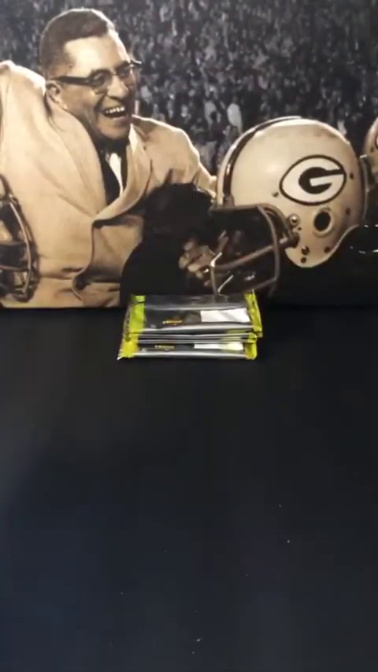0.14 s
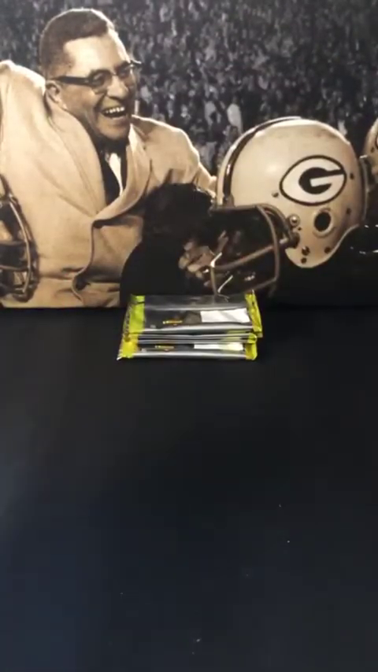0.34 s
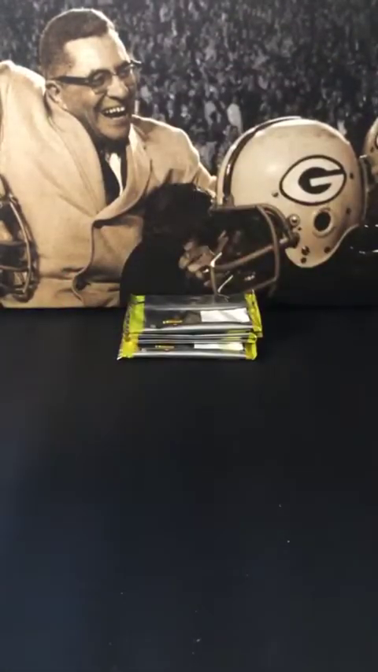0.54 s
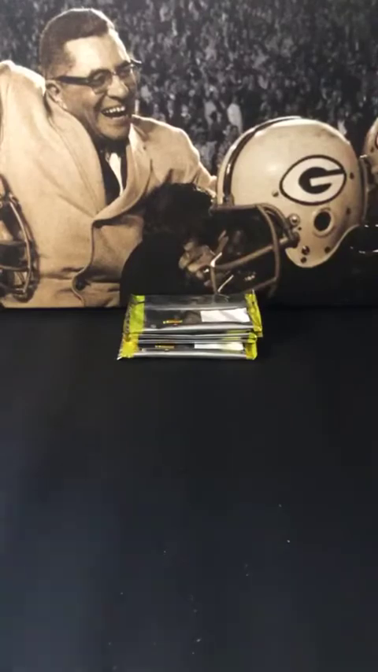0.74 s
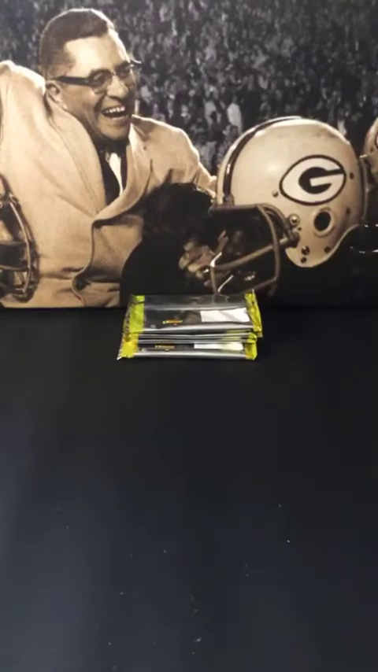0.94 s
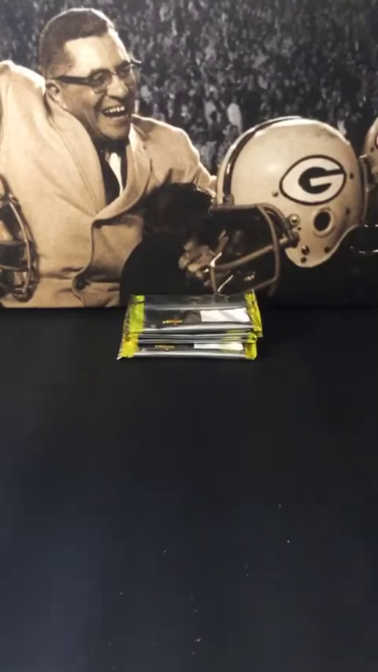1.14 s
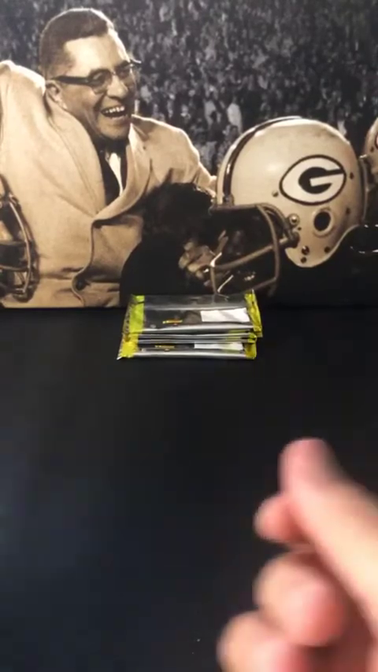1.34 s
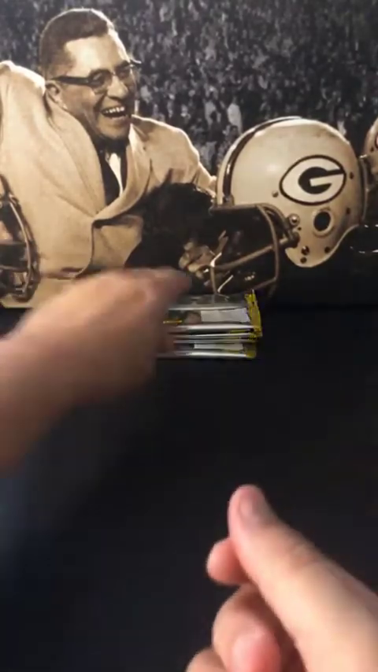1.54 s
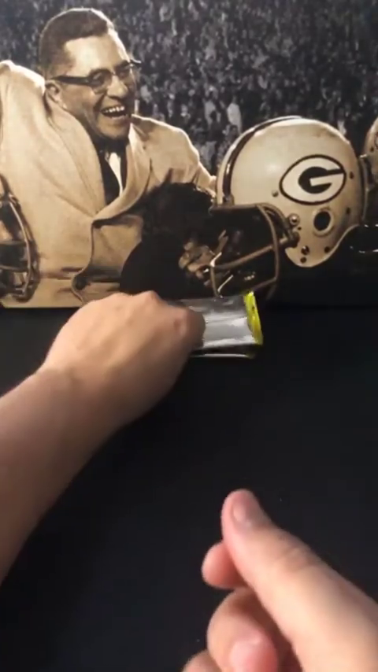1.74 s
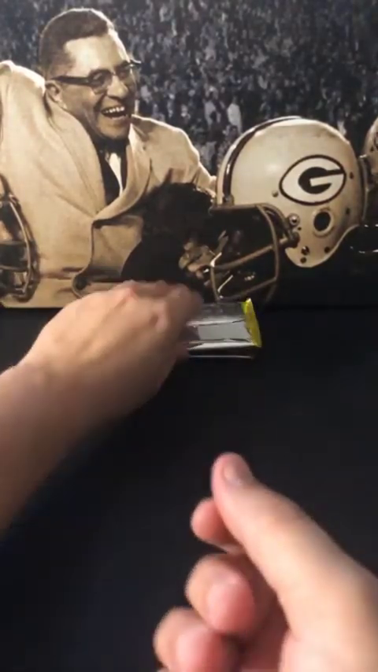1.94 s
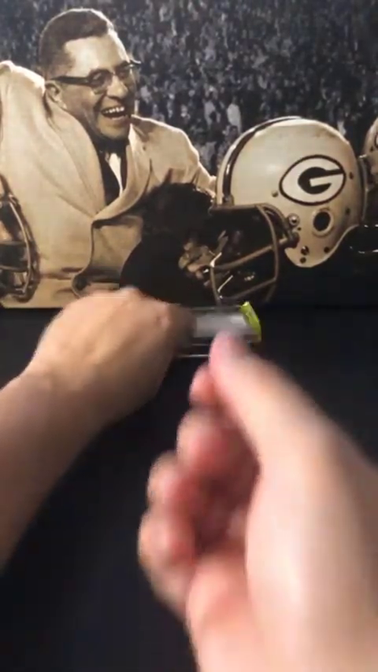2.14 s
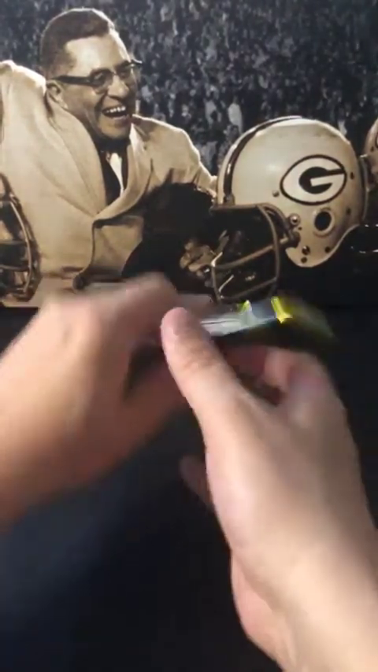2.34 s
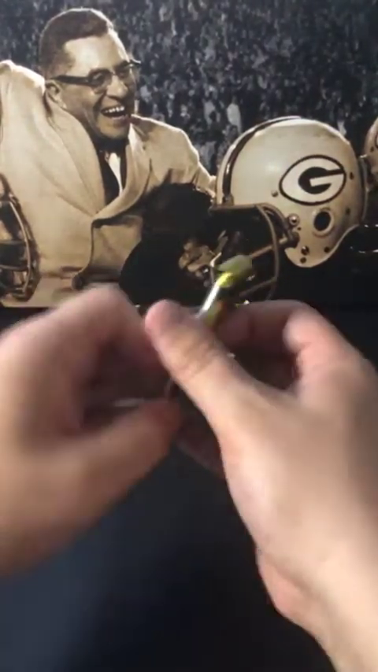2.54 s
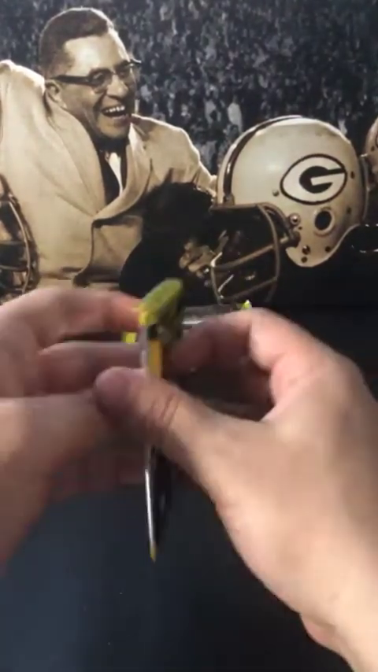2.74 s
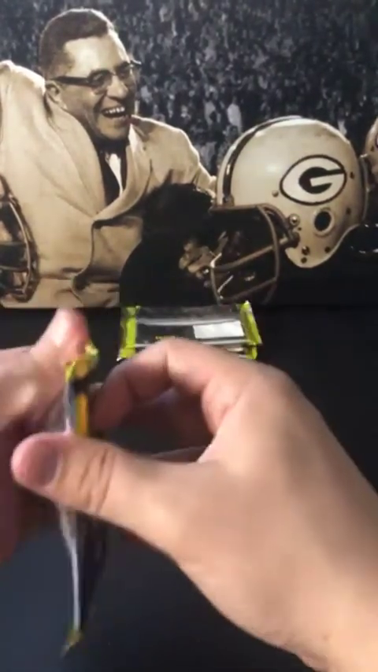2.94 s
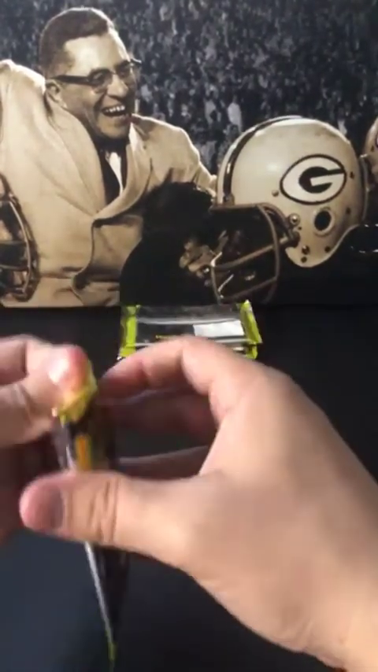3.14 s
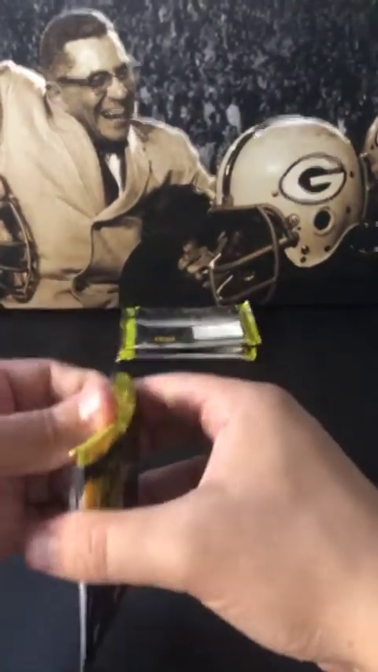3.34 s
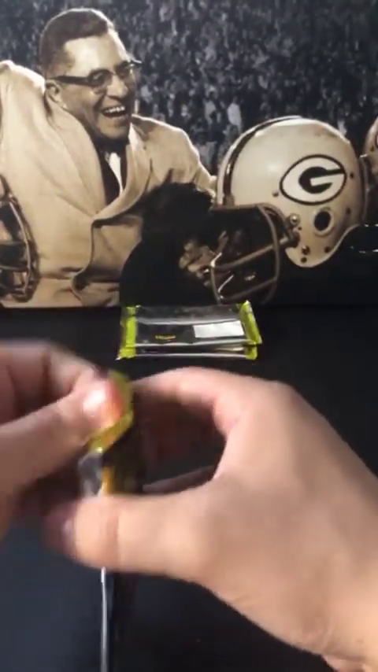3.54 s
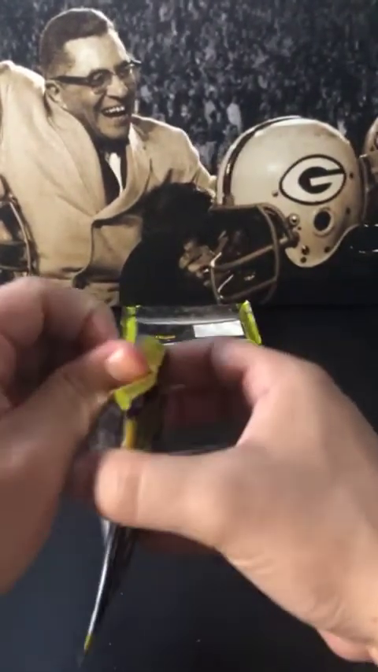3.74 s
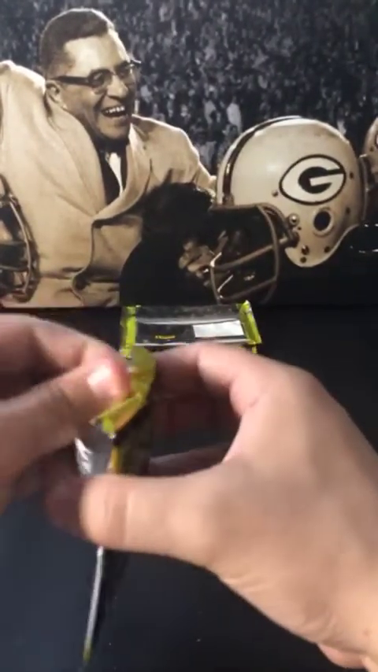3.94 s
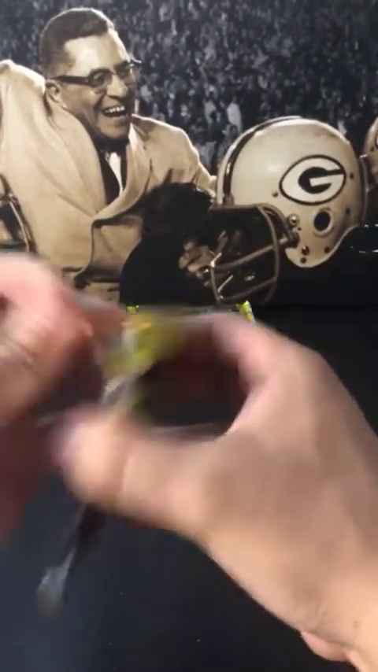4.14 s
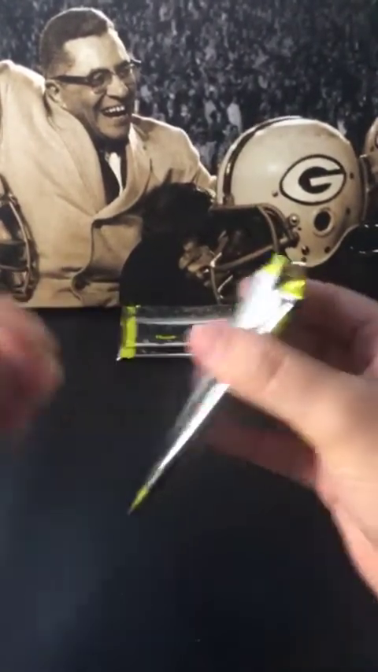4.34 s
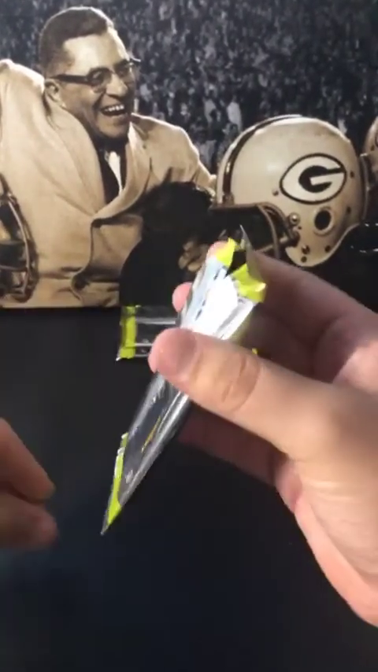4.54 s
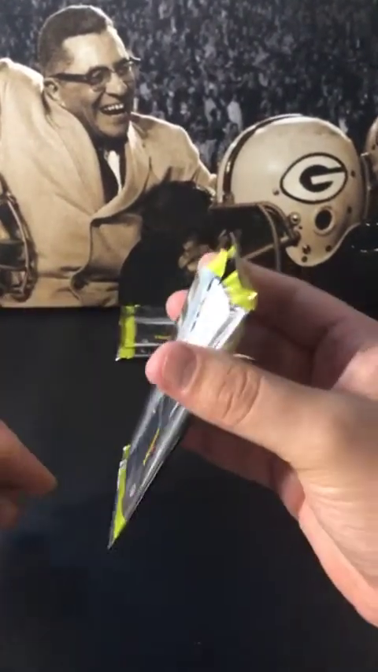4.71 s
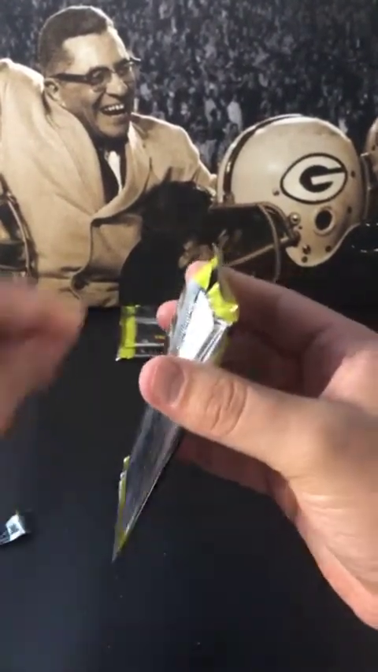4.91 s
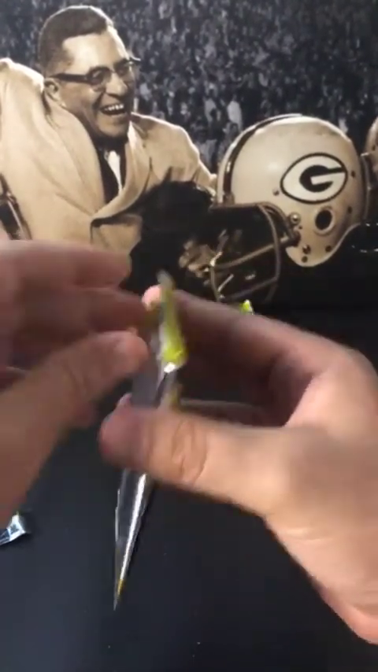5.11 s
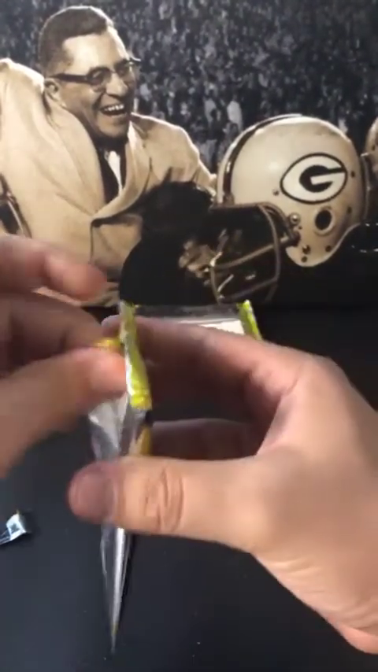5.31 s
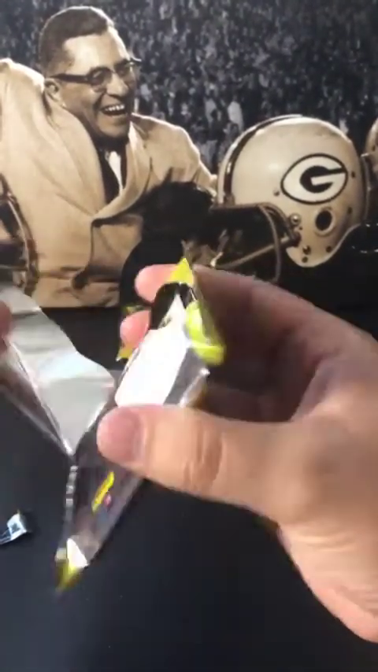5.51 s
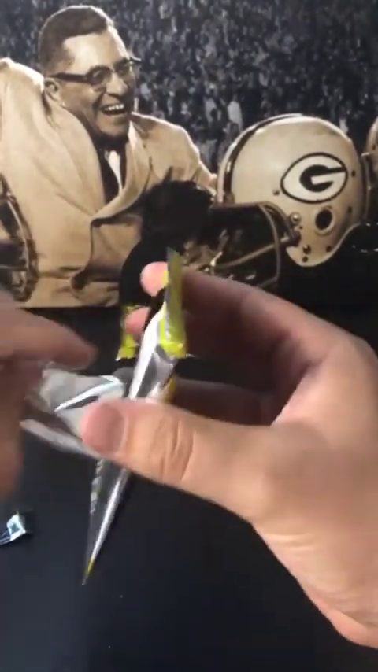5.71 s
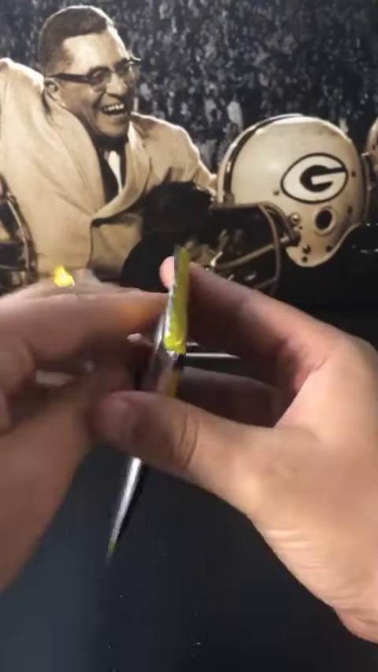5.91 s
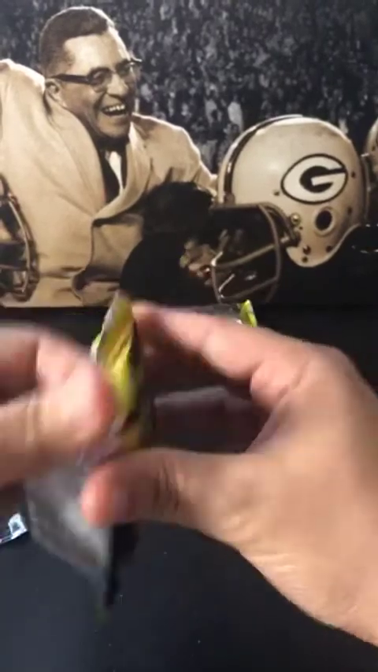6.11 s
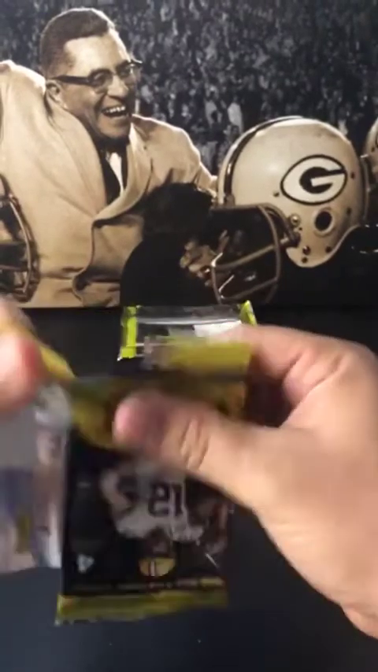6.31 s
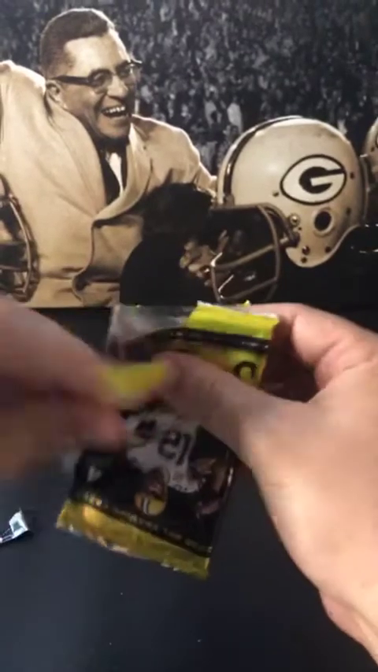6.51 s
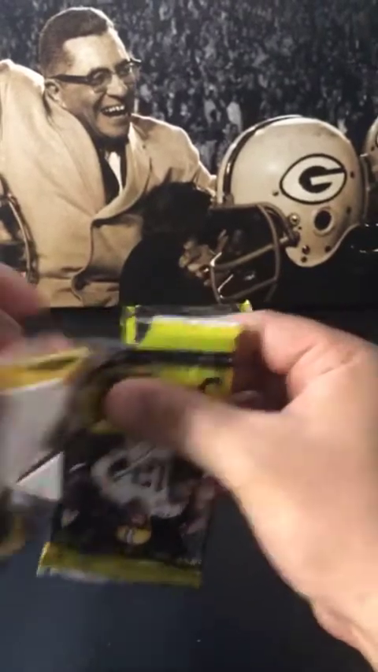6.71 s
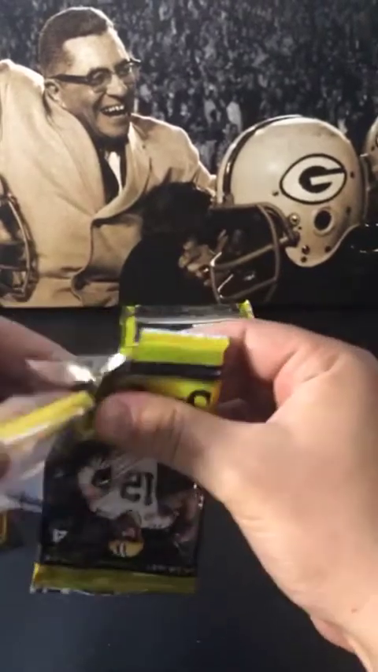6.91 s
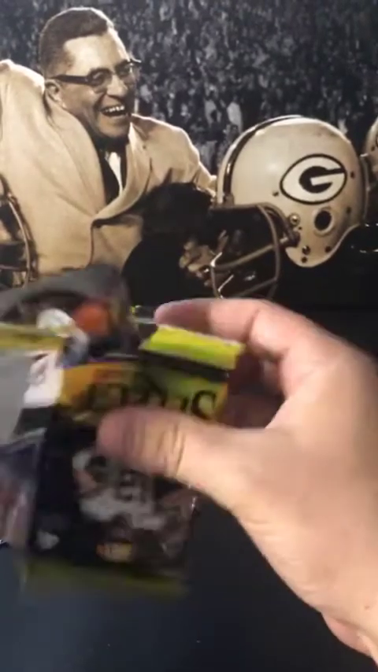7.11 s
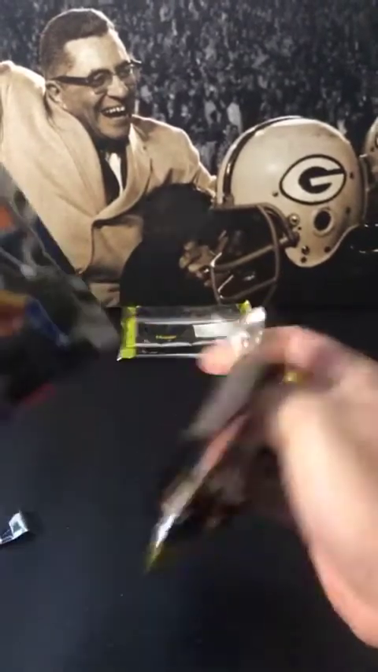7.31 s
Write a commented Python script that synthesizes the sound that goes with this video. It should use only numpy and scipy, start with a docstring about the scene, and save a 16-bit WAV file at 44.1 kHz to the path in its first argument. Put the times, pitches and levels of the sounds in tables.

```python
"""A foil pack is picked off a table, crumpled at the seam, ripped open and peeled back, close by.
Creases buckle in short snaps over a finer crackle, each tear is a dense train of tiny fractures, and table
reflection and microphone colour them all. The loose sheet and the cards push air in low lumps.
Skin and sleeve slide, the table rumbles under the leaning arm, and at first something ticks nearby.
The small soft room answers briefly and hums low."""
import sys
import numpy as np
from scipy import signal
from scipy.fft import rfft, irfft, next_fast_len
from scipy.io import wavfile
from scipy.ndimage import uniform_filter1d

SR = 44100
rng = np.random.default_rng(int(sys.argv[2]) if len(sys.argv) > 2 else 0)


def generate_wav(sig):
    """Save sig (samples, or channels by samples) to the path in sys.argv[1] as 16-bit PCM at SR."""
    pcm = np.round(np.clip(np.atleast_2d(sig).T, -1, 1) * 32767).astype(np.int16)
    wavfile.write(sys.argv[1], SR, pcm)


N = 328986

# Spectra of room tone, table, friction and foil. Each row: frequency in Hz, relative density in dB.
HUM_SPECTRUM = [(53, -24.5), (90, -3), (210, -5.5), (279, -8), (558, -13.5), (650, -18), (1550, -24),
                (1770, -24.5), (12500, -47), (14900, -46.5), (16200, -76.5)]
TABLE_SPECTRUM = [(18, -40), (30, 2), (54, -1.5), (78, -4), (193, -22), (231, -42.5), (270, -43.5),
                  (300, -60.5), (390, -85.5), (660, -120)]
FRICTION_SPECTRUM = [(590, -8.5), (1000, -18), (1770, -6.5), (1970, -8.5), (4000, -16.5), (6090, -18),
                     (12100, -23.5), (16200, -33)]
FOIL_SPECTRUM = [(250, -41.5), (400, -2.5), (700, -8.5), (1000, 8.5), (1800, 8), (2600, 10.5), (3300, 0.5),
                 (4700, 9.5), (6800, 1.5), (11700, 0.5), (14000, -4.5), (16200, -8)]
# Room resonances; peaks and dips of table reflection and microphone that colour the foil and sliding.
# Each row: centre in Hz, bandwidth in Hz, gain added at the centre.
ROOM_MODES = [(171, 7.1, 1.2), (275.5, 12, 2.4), (397, 38, 1.5)]
CLOSE_COLOUR_MODES = [(644, 860, -0.56), (906, 350, 0.48), (1600, 360, -0.042), (2480, 1500, -0.45),
                      (3275, 1090, 0.49), (3920, 380, 0.22), (5640, 1600, -0.21)]
# Arms knock or lean on the table. Each row: start in seconds, hold in seconds, level in dB.
ARM_BUMPS = [(.915, .03, -48), (1.28, .03, -53), (1.71, 0.21, -31), (2.11, 0.038, -51.5),
             (2.27, 0.13, -45.5), (2.52, 0.025, -43.5), (2.69, 0.036, -48.5), (3.245, .03, -34.5),
             (3.945, 0.034, -42.5), (4.1, 0.11, -45.5), (5.3, 0.039, -47.5), (5.66, 0.063, -53.5),
             (6.03, 0.052, -48)]
# Dry ticks. Each row: start in seconds, peak in dB, pitch in Hz, relative treble level in dB.
DRY_TICKS = [(0.1565, -36.5, 2030, -22), (0.1644, -24.5, 2170, -21), (0.1722, -33, 4760, -21),
             (0.556, -50, 1560, -9), (0.8073, -42, 1530, -28), (0.8253, -32.5, 1550, -33),
             (0.8881, -31.5, 1700, -2.5), (0.8974, -34.5, 1010, -24), (1.3174, -51, 1510, -20)]
# Envelopes of sliding skin and sleeve, of the sleeve's swish, and of the hands at work on the foil
# (picking up, prying, peeling), one list a stroke. Each row: time in seconds, level in dB.
SLIDE_STROKES = [
    [(0.95, -96), (1.316, -67), (1.54, -66)],
    [(1.55, -54.5), (1.69, -47)],
    [(1.69, -51.5), (1.96, -74)],
    [(1.96, -51.5), (2.09, -47.5), (2.186, -61), (2.31, -91)],
]
SLEEVE_STROKES = [
    [(1.0, -83), (1.3, -76), (1.54, -71)],
]
HAND_STROKES = [
    [(1.55, -57), (1.7, -60), (1.8, -71.5), (1.95, -75), (1.99, -64), (2.1, -62), (2.2, -70), (2.3, -68.5)],
    [(2.3, -62), (2.37, -58), (2.49, -53), (2.65, -55), (2.78, -43), (2.87, -39), (3.05, -39), (3.35, -58),
     (3.46, -40.5), (3.6, -49), (3.93, -47), (4.1, -51), (4.26, -54), (4.33, -64), (4.59, -56.5),
     (4.7, -65)],
    [(5.04, -70), (5.1, -55), (5.23, -59), (5.3, -44), (5.45, -43), (5.5, -58), (5.64, -44), (5.76, -55),
     (5.89, -51), (6.02, -36), (6.26, -44), (6.48, -48), (6.6, -44), (6.8, -56), (6.93, -46), (7.15, -45),
     (7.27, -39), (7.46, -40)],
]
# Buckling creases. Each row: start in seconds, peak of the buckled patch in dB, its pitch in Hz,
# body and sizzle in dB relative to the patch, nominal length in milliseconds.
CREASE_SNAPS = [(1.5585, -28, 3700, 0.5, -15, 4.7), (1.5848, -21.5, 3790, -4, -17, 2),
                (1.5963, -36, 3830, 8, -12, 2.8), (1.6098, -34, 1590, 3, -14, 5.4),
                (1.6535, -23.5, 4130, -5, -7, 5.6), (1.6778, -28.5, 4690, -4, -8.5, 4.7),
                (1.731, -29.5, 4300, -2.5, -9, 5.5), (1.757, -34.5, 1940, -5, -10.5, 3.5),
                (1.8522, -41, 1660, 4.5, -25, 5.1), (1.9672, -29, 3760, 4.5, -23.5, 3),
                (1.9972, -18, 3460, -9.5, -35, 0.87), (2.0674, -35.5, 4010, -13, -24.5, 4.4),
                (2.0738, -27.5, 4050, -7, -12.5, 3.7), (2.0979, -26.5, 1770, -8, -15, 7.7),
                (2.1294, -30.5, 1810, -6, -14, 2.8), (2.1513, -40, 1850, -2, -4, 2.4),
                (2.3166, -24, 3950, -0.5, -2, 9.5), (2.385, -32, 1420, 2, -6, 8.2),
                (2.4232, -30, 3700, -1.5, -4, 2.1), (2.461, -28.5, 1430, -6, -19, 1.7),
                (2.4854, -33.5, 4180, -6, -14, 4.6), (2.5167, -28, 4180, -13, -5, 1.4),
                (2.5363, -32, 4390, -18, -0.5, 3.3), (2.5431, -20.5, 6030, -7.5, 0, 3.6),
                (2.618, -24, 4780, -23.5, 1, 4.1), (2.6267, -24, 4050, -27, 2, 4.2),
                (2.6427, -26, 4180, -18.5, 2, 3.6), (2.681, -17.5, 3420, -33, -2, 4.4),
                (2.699, -19.5, 4200, -16, -2, 28), (2.7113, -12, 3930, -8, -2.5, 9.5),
                (2.7234, -11, 4300, -25, -12, 1.6), (2.7647, -22, 6120, -26.5, 5, 2.5),
                (2.7977, -7.5, 3660, -28, -12, 2.4), (2.809, -22.5, 3620, -17, 7.5, 4.2),
                (2.8524, -21, 3170, -9, 0, 6.4), (2.8618, -18, 3470, -3.5, -13.5, 5.5),
                (2.8734, -15, 3960, -17, -5, 5.3), (2.8806, -9, 3470, -8.5, -1.5, 6.5),
                (2.887, -20, 5940, -20, -1, 6.8), (2.8944, -7, 3760, -19, -4, 2.4),
                (2.904, -24, 4870, -18, 12, 2.3), (2.9117, -18, 3790, -18, 5, 2.8),
                (2.9185, -14, 3100, -3, -10, 1.7), (2.9262, -23.5, 3360, -5, -4, 5.0),
                (2.9432, -10, 3200, -2, -8, 7.1), (2.952, -17, 3700, -1, 2, 1.9),
                (3.0206, -22, 3900, -24, 6.5, 3.3), (3.047, -15.5, 3060, -23, -0.5, 4.5),
                (3.067, -7.5, 4500, -21, -3, 3.3), (3.0922, -14.5, 5000, -30, -2, 1.9),
                (3.1233, -13.5, 3800, -11, 0, 5.9), (3.1341, -24, 3620, -35, -8, 5.4),
                (3.1427, -17, 4610, -10, 3, 6.9), (3.1696, -7.5, 3560, -1.5, -5.5, 2.7),
                (3.1835, -14.5, 4350, -17, -8, 6.6), (3.1971, -22, 2120, 5.5, -7, 5),
                (3.2165, -8, 3250, -34, -12, 4.1), (3.2309, -6.5, 3530, -21, -5, 5.9),
                (3.2518, -24, 3960, -1, -3, 4.3), (3.2868, -22, 1510, -13, -15, 3.8),
                (3.293, -1.5, 3050, -29, -13, 2.7), (3.319, -19.5, 5000, 3.5, -16, 1.7),
                (3.3476, -3, 6800, -9.5, -18, 3.2), (3.3696, -11, 3440, -27, -24, 4.3),
                (3.4217, -17.5, 3630, -12, -16.5, 4), (3.4288, -18, 3330, 0.5, -26, 2.8),
                (3.476, -17, 6160, -27, -5, 3.7), (3.499, -14, 1370, -27, 2, 3.2),
                (3.5139, -30, 4690, -9.5, 7, 3.3), (3.526, -17, 3940, -25.5, -3, 2.7),
                (3.5371, -31.5, 3360, 1, 15, 3.6), (3.5612, -11.5, 3530, -15, -11, 4.7),
                (3.598, -31, 3870, -12, -11, 3.1), (3.6203, -18, 3790, -15.5, -12, 2.5),
                (3.628, -17.5, 4780, -6.5, -5.5, 4.2), (3.6427, -16, 3500, -11, -8, 2.7),
                (3.6488, -15, 3230, -4.5, 5.5, 3.3), (3.6583, -22.5, 6120, -27, -5, 2.8),
                (3.6652, -16, 4650, -21, -2, 2.5), (3.6955, -19, 1403, 0, -2, 2.4),
                (3.7341, -17.5, 4930, -17, -3, 4.8), (3.7427, -25.5, 3790, -1, -1.5, 3.6),
                (3.7505, -21.5, 3320, -1.5, 5, 6.2), (3.7671, -26, 4780, 0, 3, 7.3),
                (3.7825, -15, 3930, -10, -5, 5.9), (3.8001, -11.5, 5870, -4.5, -7, 5.2),
                (3.8571, -22, 1470, -15, -23, 7.3), (3.899, -27, 3790, 1, 8.5, 5.2),
                (3.9437, -11.5, 3270, -1, 2, 21), (3.9586, -6.5, 2560, -4.5, -5, 3.3),
                (3.9914, -9, 3620, 0, -6.5, 1.8), (4.0358, -23, 4600, 1.5, -7, 5),
                (4.0798, -26, 4010, 0, -3, 4.2), (4.1013, -5, 3100, -9, -5.5, 7.7),
                (4.111, -9.5, 3700, -4.5, -10, 12), (4.1206, -14.5, 3430, -5, 3, 3.9),
                (4.1404, -14, 3400, -0.5, -6, 3), (4.1497, -19.5, 3100, -6, -11, 19.6),
                (4.156, -16.5, 3530, 2, 5, 7.4), (4.2736, -23, 2620, -5, -2, 7.1),
                (4.3043, -16, 4680, -20, -2.5, 2.07), (4.402, -47, 4000, -20, 16, 1.9),
                (4.4435, -33, 2500, 0, -6, 3.4), (4.5126, -29.5, 2350, -5.5, -1.5, 2.6),
                (4.5588, -9.5, 4090, -14, -4.5, 5.4), (4.6388, -27, 4300, -6, -7, 8.5),
                (4.7179, -43.5, 2940, 3, -32, 5), (4.7744, -49, 4130, -10, 0, 2.7),
                (5.0226, -47.5, 1500, 9.5, -17, 2.3), (5.0589, -28.5, 2490, 1, -10, 4.8),
                (5.075, -21.5, 5200, -3.5, -6, 6.1), (5.0819, -22, 6980, -24, -1, 3.6),
                (5.0889, -18.5, 6370, -20, -2, 4), (5.0974, -21.5, 3980, -26, 0.5, 4.8),
                (5.1167, -21.5, 6530, -20, 0, 4), (5.142, -30.5, 5640, 0, -6, 7.7),
                (5.175, -31.5, 4010, -6, -22, 3.4), (5.203, -15.5, 1550, -6, -0.5, 4.1),
                (5.2074, -18.5, 4060, -2.5, -3, 6.4), (5.2789, -13.5, 6200, -3, 2.5, 4.9),
                (5.2863, -11.5, 4220, -3.5, 1, 2.3), (5.2967, -8, 3050, -6.5, -6, 6),
                (5.3056, -19.5, 3920, -7, -7, 5.3), (5.3222, -15, 4650, 4, -12.5, 4.1),
                (5.3321, -3.5, 4440, -11, -0.5, 5.4), (5.3477, -7.5, 3800, -9, -13.5, 3.5),
                (5.3604, -13, 5990, 0, 0, 5.4), (5.4786, -24.5, 5600, -19, -20, 2.8),
                (5.4978, -32.5, 3900, -8, 7, 2.2), (5.5202, -21.5, 3960, -29.5, -1.5, 4.8),
                (5.568, -22, 2800, -5, 5, 6.8), (5.5776, -17, 4030, -9.5, 0.5, 2.9),
                (5.5992, -16.5, 2500, -8, -10, 3.6), (5.6097, -18, 2560, -12, -9.5, 2.8),
                (5.6265, -32, 4740, -11, -11, 4.0), (5.6615, -13.5, 4970, -11, -3, 13.6),
                (5.704, -31, 3190, -4, -13, 2.2), (5.7842, -28.5, 6290, 4, -15, 12.6),
                (5.8345, -15, 3920, -10.5, -9.5, 5), (5.8648, -25.5, 3140, -12, 3, 6.8),
                (5.8776, -25.5, 3030, -1, -8, 4.9), (5.9189, -11, 2620, -13, -7, 4.4),
                (5.9317, -16.5, 2950, -11.5, -1, 7.1), (5.9919, -13, 2940, -13, -6.5, 3.5),
                (6.003, -14.5, 4650, -2, 0, 2.1), (6.0249, -13.5, 2600, -1, 1, 3.6),
                (6.0326, -13.5, 2710, -13, 8, 3.3), (6.0423, -1, 2280, -10.5, -12, 7.3),
                (6.0578, -21, 3880, 1, -10, 9.7), (6.067, -11.5, 2530, -22, -3.5, 4.4),
                (6.0858, -11, 2560, -18, -4, 5), (6.1022, -8.5, 5340, -27, -6, 4.5),
                (6.1236, -10.5, 4780, -3.5, 4.5, 3.1), (6.1493, -7.5, 4650, -29, -1, 5.7),
                (6.1553, -11, 2280, -4.5, -11, 3), (6.1613, -21, 4200, 3, 3, 3.5),
                (6.178, -10.5, 4090, -9.5, -8, 2.8), (6.1852, -2, 4430, -30, -6.5, 1.8),
                (6.2008, -28, 3920, -19, -12.5, 3.1), (6.229, -22, 4050, -6, -1, 4.0),
                (6.2434, -19.5, 2850, 3.5, 6.5, 6), (6.2643, -19.5, 4740, -4, -11.5, 5.4),
                (6.307, -23.5, 2970, 2, -3, 2.9), (6.3274, -17.5, 4820, -6.5, -20, 5.6),
                (6.3606, -26, 1520, -3, -1.5, 6.5), (6.3869, -30, 3960, 4, -1.5, 4.7),
                (6.3941, -20.5, 6030, 1.5, 2.5, 5.4), (6.4231, -13, 4870, -6, 4.5, 3.8),
                (6.445, -24, 1400, -4, -8, 14), (6.47, -22.5, 4470, -8, -5.5, 3),
                (6.494, -11.5, 3630, -2.5, -6, 1.2), (6.5702, -8, 5960, -8.5, 0, 2.8),
                (6.5967, -6, 4030, -10.5, -4, 3.5), (6.6113, -20.5, 1410, -4, -5, 4.7),
                (6.6383, -13.5, 4420, -1, -9, 2.6), (6.7068, -28, 4200, -12, -5, 3.2),
                (6.7354, -34, 1500, 10, -19, 1.6), (6.7775, -14, 4610, -18, 5.5, 3.6),
                (6.7838, -13.5, 5930, -1.5, 1, 3.9), (6.8616, -22.5, 5000, -28, -6, 11),
                (6.9099, -22.5, 5900, 1, -12, 3.3), (6.9171, -14.5, 4800, -6.5, -8, 3.5),
                (6.927, -17, 4600, -22.5, -9, 3.2), (7.0834, -21.5, 3790, -16, -1.5, 5.8),
                (7.106, -17, 3700, -8, -14, 2.9), (7.1428, -23, 3620, -6.5, -6, 4.3),
                (7.161, -9.5, 3920, -14, 0, 2.3), (7.1771, -23, 1430, -10, 4, 5.7),
                (7.202, -22.5, 2020, 0, 1, 5.3), (7.2305, -21, 1470, -16, -8.5, 7.5),
                (7.2591, -7, 5100, -20, 0.5, 2.2), (7.2662, -18.5, 1420, 1, 5, 5.6),
                (7.2762, -9.5, 2930, -8.5, 3.5, 3.1), (7.3185, -17.5, 4740, -4, -10, 3.8),
                (7.3382, -16, 4910, -20, -14, 3.1), (7.3737, -14, 5760, -25, -1.5, 5.7),
                (7.3905, -17, 3000, -9.5, -0.5, 3.5), (7.4085, -20, 4870, -15, -6, 2),
                (7.4128, -33.5, 3190, 3, -10, 7.0)]
# The sheet and cards lurch. Each row: start in seconds, flap level in dB, deep push level in dB.
SHEET_LURCHES = [(2.315, -41, -54), (2.944, -44.5, -63.5), (3.167, -47, -68), (3.436, -40, -49),
                 (3.627, -44, -65), (3.936, -44, -60), (4.111, -42, -33.5), (4.152, -46, -43),
                 (5.277, -45, -52), (5.324, -30.5, -53), (5.403, -30.5, -44), (5.66, -37.5, -47),
                 (6.035, -60, -41), (6.101, -51.5, -52), (6.224, -34, -39), (6.445, -32.5, -43.5),
                 (6.78, -44, -46), (6.909, -51, -43.5), (7.175, -55, -51), (7.273, -66, -50)]
# Tears along the seam. Each row: start, rise and run in seconds, top level in dB, fall over the run in dB.
SEAM_TEARS = [(2.69, .022, .022, -35, 15), (2.85, 0.015, 0.032, -31.5, 20),
              (2.934, 0.0069, 0.022, -21.5, 29), (3.927, 0.015, 0.034, -11, 39),
              (4.099, 0.0044, .066, -19.5, 17.5), (5.261, 0.035, 0.02, -25, 9),
              (5.315, .02, .115, -24.5, 7.5), (6.02, 0.024, 0.012, -18, 26),
              (6.049, 0.0071, 0.19, -32.5, 1.5)]


def from_db(db):
    """Amplitude ratio of a level in decibels."""
    return 10 ** (np.asarray(db) / 20)


def unit_rms(x):
    """Normalisation to an rms of 1."""
    return x / np.sqrt(np.mean(x ** 2) + 1e-20)


def band(x, low_hz, high_hz):
    """Butterworth band-pass filtering, normalised to unit rms."""
    return unit_rms(signal.sosfilt(signal.butter(2, [low_hz, high_hz], "band", fs=SR, output="sos"), x))


def colour(x, spectrum):
    """Spectral shaping along a logarithmic frequency axis, normalised to unit rms."""
    hz, db = np.transpose(spectrum)
    size = next_fast_len(N)
    bin_hz = np.maximum(np.arange(size // 2 + 1) * SR / size, 1)
    gain = from_db(np.interp(np.log(bin_hz), np.log(hz), db))
    return unit_rms(irfft(rfft(x, size) * gain, size)[:N])


def drift(hz):
    """Slow random fluctuation: low-passed noise of unit rms."""
    pole = np.exp(-2 * np.pi * hz / SR)
    return unit_rms(signal.lfilter([1], [1, -2 * pole, pole * pole], rng.standard_normal(N + SR))[SR:])


def decay(size, t60_s):
    """Exponential decay, 60 dB in t60_s."""
    return from_db(-60 * np.arange(size) / SR / t60_s)


def resonance(x, hz, width_hz):
    """A damped resonator with unit gain at its centre."""
    r = np.exp(-np.pi * width_hz / SR)
    feedback = [1, -2 * r * np.cos(2 * np.pi * hz / SR), r * r]
    return (1 - r * r) / 2 * signal.lfilter([1, 0, -1], feedback, x)


def through_modes(x, modes):
    """Parallel resonators reinforce or cancel x around each mode."""
    return x + sum(gain * resonance(x, hz, width_hz) for hz, width_hz, gain in modes)


def add(out, start_s, sound):
    """Superposition of a sound on out."""
    at = round(start_s * SR)
    out[at:at + len(sound)] += sound[:N - at]


def stroke_gain(strokes):
    """Smoothed envelope of strokes, linear in decibels within each and silent between."""
    t = np.arange(N) / SR
    gain = sum(from_db(np.interp(t, *np.transpose(rows), left=-200, right=-200)) for rows in strokes)
    return uniform_filter1d(gain, 130)


def push_gain(pushes, rise_s, t60_s):
    """Envelope of pushes: linear rise, hold, exponential decay."""
    t = np.arange(N) / SR
    gain = np.zeros(N)
    for start, hold, db in pushes:
        fall_db = 60 * np.maximum(t - start - rise_s - hold, 0) / t60_s
        gain += np.clip((t - start) / rise_s, 0, 1) * from_db(db - fall_db)
    return gain


def room_hum():
    """Room modes reinforce a low, slightly wavering noise."""
    noise = colour(rng.standard_normal(N), HUM_SPECTRUM)
    return from_db(-54 + drift(hz=4.4)) * through_modes(noise, ROOM_MODES)


def table_rumble():
    """Forced vibration: the table shakes faintly throughout and jolts under the arms."""
    gain = from_db(-53.5 + drift(hz=3)) + push_gain(ARM_BUMPS, rise_s=0.012, t60_s=0.36)
    return gain * colour(rng.standard_normal(N), TABLE_SPECTRUM)


def ticks(ping_s=.171, ping_hz=4780, ping_db=-37):
    """Light impacts on something hard excite a broad, damped resonance; one clear ping rings among them."""
    out, size = np.zeros(N), 4000
    onset = 1 - decay(size, t60_s=0.0062)   # soft contact
    bursts = rng.standard_normal((len(DRY_TICKS), 3, size)) * decay(size, t60_s=0.024) * onset
    for (start, peak_db, hz, treble_db), (ring, knock, treble) in zip(DRY_TICKS, bursts):
        tick = unit_rms(resonance(ring, hz, .4 * hz)) + .8 * band(knock, 300, 6000)
        tick += from_db(treble_db) * band(treble, 8900, 14400)
        add(out, start, from_db(peak_db) * tick / np.abs(tick).max())
    ping = np.sin(2 * np.pi * ping_hz * np.arange(size) / SR) * decay(size, t60_s=.06)
    add(out, ping_s, from_db(ping_db) * ping)
    return out


def reverberation(x, tails=8, gap_s=0.0028, level_db=-11.5):
    """Diffuse reflections follow a short gap; their pattern changes as the hands move."""
    out, size = np.zeros(N), SR // 3
    position = np.arange(N) // 1300 % tails   # another tail about every 30 ms
    envelope = decay(size, t60_s=0.14) * (np.arange(size) > gap_s * SR)
    for k in range(tails):
        tail = band(rng.standard_normal(size) * envelope, 300, 12000)
        out += signal.fftconvolve(x * (position == k), tail / np.linalg.norm(tail))[:N]
    return from_db(level_db) * out


def sliding():
    """Sliding friction of skin and sleeve gives a wavering broadband hiss."""
    gain = stroke_gain(SLIDE_STROKES) * from_db(2.5 * drift(hz=10))
    return gain * colour(rng.standard_normal(N), FRICTION_SPECTRUM)


def sleeve_swish():
    """Cloth friction gives a thin high hiss as the arm reaches in."""
    return stroke_gain(SLEEVE_STROKES) * band(rng.standard_normal(N), 9500, 14500)


def effort_gain(strain_t60_s=.08, settle_t60_s=.3, still_db=-45, swing_share=0.28):
    """Strain and relaxation: the hands' envelope swells into each listed snap and settles after it."""
    t = np.arange(N) / SR
    starts, peak_db = np.transpose(CREASE_SNAPS)[:2]
    kick_db = np.full(N, float(still_db))
    kick_db[(starts * SR).astype(int)] = peak_db
    fall, rise = 60 * t / settle_t60_s, 60 * t / strain_t60_s
    settling = np.maximum.accumulate(kick_db + fall) - fall
    straining = (np.maximum.accumulate(kick_db[::-1] + rise) - rise)[::-1]
    stirred_db = np.maximum(settling, straining)
    swing_db = stirred_db - uniform_filter1d(stirred_db, SR // 4)
    return stroke_gain(HAND_STROKES) * from_db(swing_share * swing_db)


def foil_grains(per_s, uneven_db, t60_s=0.0092):
    """Shot noise: tiny random events in the foil, each a decaying puff, with the mean level evened out."""
    sizes = from_db(uneven_db * np.minimum(rng.exponential(1, N), 4))
    impulses = sizes * (rng.random(N) < per_s / SR)
    pole = from_db(-60 / (t60_s * SR))
    puffs = signal.lfilter([1], [1, -pole], impulses) * rng.standard_normal(N)
    power = uniform_filter1d(puffs ** 2, SR // 10)
    return colour(puffs / np.sqrt(power + .05 * power.mean()), FOIL_SPECTRUM)


def crackle():
    """Crumpling releases tiny creases in clumps, over the friction hiss of fingers on foil."""
    creases = foil_grains(per_s=1000 * from_db(7 * drift(hz=29)), uneven_db=2)
    fingers = from_db(-6.5) * band(rng.standard_normal(N), 2500, 21000)
    return effort_gain() * creases + stroke_gain(HAND_STROKES) * fingers


def snaps(creases, rise_share=0.15):
    """Buckling: as a crease lets go, its patch rings, the pack adds body and the edge sizzles."""
    out, size = np.zeros(N), 1200
    t_ms = np.arange(size) / SR * 1000
    for start, peak_db, hz, body_db, sizzle_db, length_ms in creases:
        ring, rattle, pack, edge = rng.standard_normal((4, size))
        rise_ms = rise_share * max(length_ms, .5)
        pulse = t_ms / rise_ms * np.exp(-t_ms / rise_ms)
        patch = unit_rms(resonance(ring * pulse, hz, .3 * hz)) + .7 * band(rattle * pulse, 1500, 7000)
        patch /= np.abs(patch).max()
        patch_rms = np.sqrt(np.mean(patch ** 2))
        body = from_db(body_db) * band(pack * decay(size, t60_s=0.027), 340, 1900)
        sizzle = from_db(sizzle_db) * band(edge * pulse, 5500, 14900)
        add(out, start, from_db(peak_db) * (patch + patch_rms * (body + sizzle)))
    return out


def small_snaps(count=170):
    """Lesser creases buckle at random, more often and more loudly under greater effort."""
    effort = effort_gain()
    cumulative = np.cumsum(effort ** .25)
    quantiles = (np.arange(count) + rng.random(count)) / count
    at = np.searchsorted(cumulative, quantiles * cumulative[-1]).clip(0, N - 1)
    peak_db = 20 * np.log10(effort[at]) + rng.normal(15.5, 5, count)
    hz = np.clip(3400 * 2 ** rng.normal(0, 0.78, count), 1400, 7000)
    body_db = rng.normal(-10, 8.5, count)
    sizzle_db = rng.normal(-9.5, 8.5, count)
    length_ms = 5.4 * 2 ** rng.normal(0, .5, count)
    return snaps(zip(at / SR, peak_db, hz, body_db, sizzle_db, length_ms))


def flapping(rise_s=.008, t60_s=.09):
    """Air displacement: the loose sheet and cards give low lumps with handling, tears and lurches."""
    handled = stroke_gain(HAND_STROKES)
    flap_lurches = push_gain([(s, 0, db) for s, db, _ in SHEET_LURCHES], rise_s, t60_s)
    deep_lurches = push_gain([(s, 0, db) for s, _, db in SHEET_LURCHES], rise_s, t60_s)
    flap_gain = from_db(-16) * handled + from_db(-20.5) * tear_gain() + flap_lurches
    deep_gain = from_db(-15.5) * handled + deep_lurches
    flap = from_db(0.81 * drift(hz=38)) * band(rng.standard_normal(N), 260, 441)
    deep = from_db(3.7 * drift(hz=26)) * band(rng.standard_normal(N), 120, 224)
    return flap_gain * flap + deep_gain * deep


def tear_gain(rise_db=21.5):
    """Envelope of the tears: a quick rise, then a fall along the run."""
    return stroke_gain([[(start, db - rise_db), (start + rise, db), (start + rise + run, db - fall_db)]
                        for start, rise, run, db, fall_db in SEAM_TEARS])


def tearing():
    """Crack propagation: a running tear breaks the film thousands of times a second, in jerks."""
    return tear_gain() * foil_grains(per_s=3000 * from_db(2.8 * drift(hz=86)), uneven_db=1.5)


def scene():
    """Superposition: table reflection and microphone colour foil and sliding; foil and ticks reverberate."""
    foil = snaps(CREASE_SNAPS) + small_snaps() + crackle() + tearing()
    direct = through_modes(foil, CLOSE_COLOUR_MODES) + ticks()
    room = room_hum() + reverberation(direct)
    friction = through_modes(sliding(), CLOSE_COLOUR_MODES) + sleeve_swish()
    return (direct + room + friction + flapping() + table_rumble())[None]


def record(dry, bass_hz=35, stopband_hz=16500):
    """Band limiting and saturation: the microphone loses deep bass, rounds peaks and cuts the top."""
    heard = signal.sosfilt(signal.butter(2, bass_hz, "high", fs=SR, output="sos"), dry)
    rounded = .9 * np.tanh(heard / .9)
    return signal.sosfilt(signal.cheby2(16, 70, stopband_hz, fs=SR, output="sos"), rounded)


dry = scene()
out = record(dry)
generate_wav(out)
```